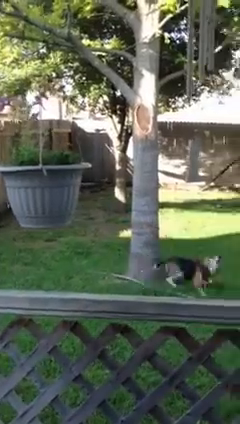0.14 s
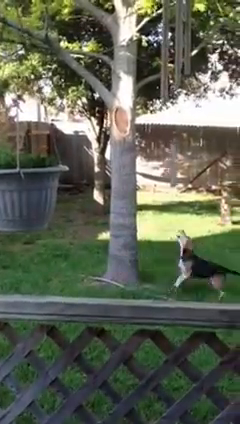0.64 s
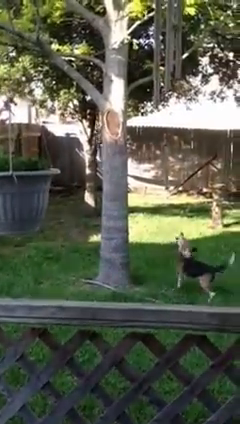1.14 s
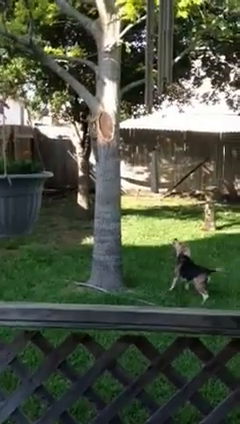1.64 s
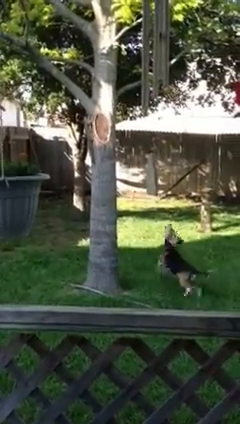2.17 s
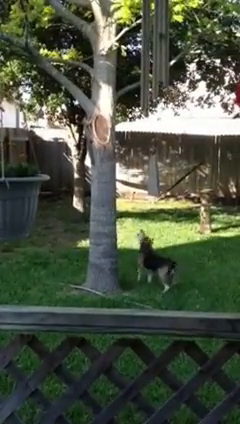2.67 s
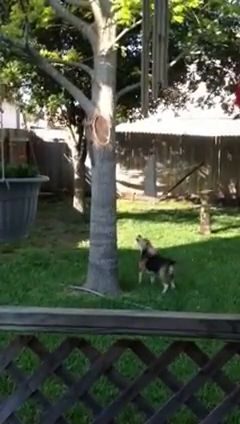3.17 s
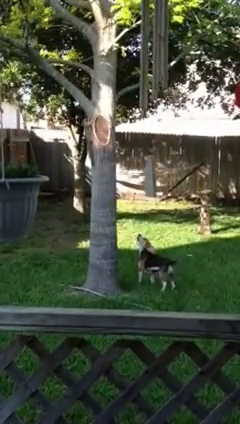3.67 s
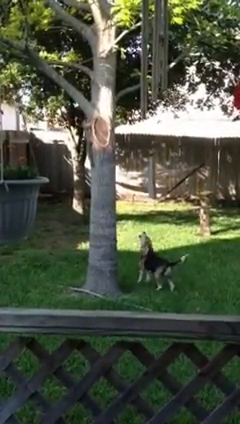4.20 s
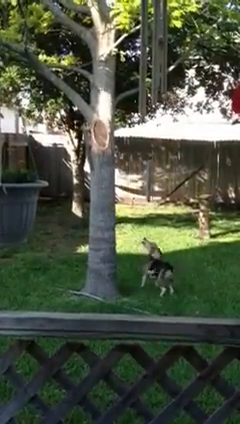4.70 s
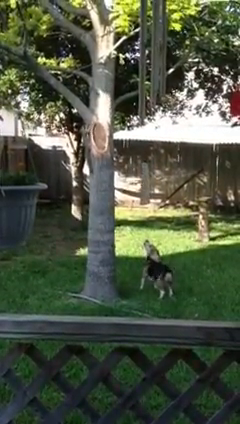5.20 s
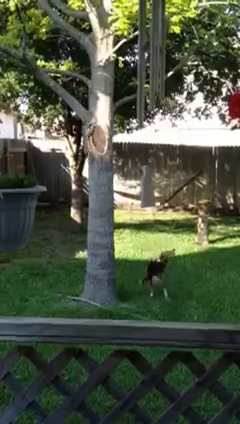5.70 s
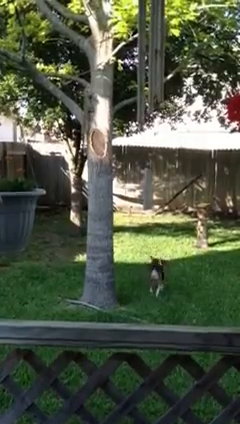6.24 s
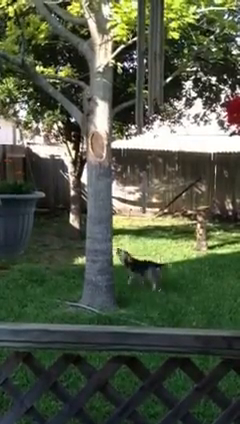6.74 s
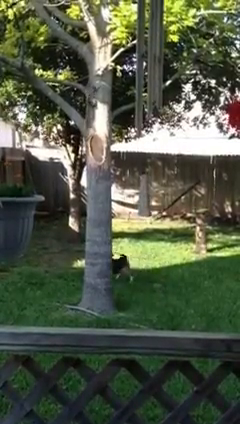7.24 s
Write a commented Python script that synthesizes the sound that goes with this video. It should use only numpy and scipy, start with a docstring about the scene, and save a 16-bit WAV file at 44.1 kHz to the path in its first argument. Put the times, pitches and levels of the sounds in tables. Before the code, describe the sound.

A hound bays in a fenced backyard, heard from several metres away, its loudest peaks slightly flattened. At 0 s a hoarse growl climbs rapidly and breaks into a clear, hollow howl around 600 Hz, wavering gently and lifting in pitch before stopping at 1.3 s. Soft paw steps brush grass near 1.8-2.1 s. A second bay runs from 2.1 to 3.2 s, rougher at the start and rising at the end; a third, from 3.8 to 4.6 s, also bends upward. Light paws patter from 4.7 to 5.3 s. A shorter bay at 5.4 s ends in a rasp near 6.1 s, followed by more steps. The last, at 6.6 s, quickly crumbles into a sagging rasp by 7 s, then a faint nasal whistle and leafy rustle. Fence echoes and a short tail follow the calls, over quiet murmur, soft bass swells and thin compressor hum.

```python
"""A hound bays five times on a fenced lawn: each call opens with a hoarse, rising growl and breaks into a
clear howl near 600 Hz. Growls are slipping pulse trains plus gated noise through a throat spectrum; howls are
harmonic lines, with half orders where cycles alternate. Two late rasps and a nasal whistle follow calls.
Fences and walls answer as echoes and a noise tail; shaped noise makes paws, stirs, bass swells and distant
murmur, steady sines a compressor next door. The loudest peaks are rounded off."""
import sys
import numpy as np
from scipy import signal
from scipy.fft import rfft, irfft, next_fast_len
from scipy.io import wavfile
from scipy.ndimage import uniform_filter1d, map_coordinates

SR = 44100
rng = np.random.default_rng(int(sys.argv[2]) if len(sys.argv) > 2 else 0)


def digitize_waveform(pressure):
    """Quantize a signal to 16-bit integers and store it at the path in sys.argv[1].

    Rows of a 2-D input are taken as channels; values are limited to [-1, 1].
    """
    field = np.atleast_2d(pressure).T
    bounded = np.clip(field, -1, 1)
    quanta = np.round(bounded * 32767).astype(np.int16)
    wavfile.write(sys.argv[1], SR, quanta)


def volts(x):
    """Linear amplitude factor 10**(x/20) for a level x in dB, scalar or array-like."""
    e = np.asarray(x, float) / 20
    return 10 ** e


N = 325017
T = np.arange(N) / SR

# open mouth and throat, relative spectrum: f/Hz, level/dB
THROAT = [(240, -68.5), (400, -20), (543, -10), (629, -4), (694, 3), (887, -8), (1080, 0), (1380, -8),
          (1590, -11), (1840, -14.5), (2070, -15), (2330, -21), (3160, -18), (3620, -40), (4200, -39.5),
          (5460, -72), (9240, -120)]
# air past the teeth, relative spectrum: f/Hz, level/dB
HISS = [(2060, -20.5), (3500, -6), (3610, 0.5), (5190, -16.5), (5760, -2.5), (6250, -4.5), (8140, -3.5),
        (10100, -18), (14300, -15.5), (15300, -20.5)]
# how far the open mouth of each call faces the listener: treble/dB
TREBLE_DB = [1.5, -1, 0, -3.5, 3.5]


def unit(x):
    """Scaled to rms 1."""
    return x / np.sqrt(np.mean(x ** 2) + 1e-20)


def along(points, hz):
    """(f/Hz, value) points interpolated on a log frequency axis."""
    f, v = np.transpose(points)
    return np.interp(np.log(hz + 1), np.log(f + 1), v)


def wobble(knots_per_s, size):
    """A smooth random curve through normally distributed knots."""
    knots = rng.standard_normal(int(size * knots_per_s / SR) + 4)
    return map_coordinates(knots, [np.arange(size) * knots_per_s / SR])


def coloured(x, spectrum):
    """x through a (f/Hz, level/dB) spectrum, at rms 1."""
    pad = 4096  # room for the zero-phase response ahead of the start
    m = next_fast_len(len(x) + 2 * pad)
    x = np.pad(x, (pad, 0))
    gain = volts(along(spectrum, np.fft.rfftfreq(m, 1 / SR)))
    return unit(irfft(rfft(x, m) * gain, m)[pad:len(x)])


def played(rows, fade_s):
    """The samples a call covers, its gate (quick start, slower end), and its columns sample by sample."""
    s, *cols = np.transpose(rows)
    span = slice(round(s[0] * SR), round(s[-1] * SR))
    t = T[span]
    gate = np.clip(np.minimum(t - s[0], (s[-1] - t) / 2.2) / fade_s, 0, 1) ** 2
    return span, gate, [np.interp(t, s, c) for c in cols]


def neighbourhood():
    """Distant murmur that drifts a little, and the slightly unsteady lines of a compressor."""
    # murmur, relative spectrum: f/Hz, level/dB
    air = [(18, -65.5), (30, -50.5), (102, -4), (201, -9), (235, -7.5), (314, -4.5), (348, -3), (440, -6),
           (704, -3), (823, -9), (1220, -8.5), (1850, -15.5), (2000, -9.5), (3110, -17), (15300, -29.5)]
    # compressor lines: f/Hz, level/dB rms before flutter
    hum_lines = [(236.9, -64.5), (355.3, -62.5), (942.1, -67), (1061, -78.5), (1179, -62), (1238, -64.5),
                 (1357, -73.5), (1766, -75.5), (1943, -76), (2003, -71), (2062, -72), (2239, -72.5),
                 (2299, -71.5)]
    murmur_db = -52 + 1.2 * wobble(2.49, size=N) + 0.6 * wobble(36, size=N)
    murmur = volts(murmur_db) * coloured(rng.standard_normal(N), air)
    drift_s = np.cumsum(1 + .0012 * wobble(8.9, size=N)) / SR  # one clock for all lines
    hum = np.zeros(N)
    for hz, db in hum_lines:
        flutter_db = 3.5 * wobble(14, size=N)
        hum += volts(db + flutter_db) * np.sqrt(2) * np.sin(2 * np.pi * (hz * drift_s + rng.random()))
    return murmur + hum


def bass_swells():
    """Soft lumps of bass noise over a low floor, with brief swells."""
    # brief swells of bass noise, some beneath the growls: t/s, peak level/dB
    swells = [(4.78, -58), (5.48, -50), (5.85, -63.5), (5.97, -57), (6.24, -55), (6.71, -54)]
    floor_db, fall_db_per_s = -64.5, 160
    band = [(25, -30.5), (70, -11.5), (150, -0.5), (230, -6.0), (500, -39.5)]  # f/Hz, level/dB
    lumps = volts(3.2 * wobble(9, size=N)) * coloured(rng.standard_normal(N), band)
    strength = volts(floor_db) + sum(volts(db - fall_db_per_s * np.abs(T - s)) for s, db in swells)
    return strength * unit(lumps)


def rustles():
    """Each paw step or thin, high stir is a burst of crackly noise around its own centre."""
    # paws in the grass: t/s, level/dB before onset and decay
    steps = [(1.84, -54), (2.07, -48), (3.408, -46.5), (4.71, -44.5), (4.951, -47.5), (5.09, -48),
             (5.209, -46), (5.337, -46.5), (6.129, -48.5), (6.27, -47.5), (6.46, -50)]
    # every paw step: decay t60/s, centre f/Hz, spread/frequency ratio
    paw = (.3, 3000, 2.2)
    # stirs, perhaps leaves: t/s, level/dB before onset and decay, t60/s, centre f/Hz, spread/frequency ratio
    stirs = [(.625, -30, 0.15, 10100, 1.3), (2.621, -51, 0.42, 11100, 2.2), (6.966, -45, 0.25, 10700, 1.8),
             (7.025, -43.5, 0.62, 6560, 1.35), (7.06, -42.5, 0.36, 4700, 1.1),
             (7.051, -49.5, 0.81, 12600, 0.7)]
    onset_s = 0.021
    out, t = np.zeros(N + SR), T[:SR // 2]
    for s, db, t60_s, hz, ratio in [(*step, *paw) for step in steps] + list(stirs):
        band = [(hz / ratio ** 2, -32), (hz / ratio, -5), (hz, 0), (hz * ratio, -6), (hz * ratio ** 2, -32)]
        grains = rng.standard_normal(len(t)) * volts(2.5 * wobble(400, size=len(t)))
        envelope = volts(db - 60 * t / t60_s) * (1 - np.exp(-t / onset_s))
        out[round(s * SR):][:len(t)] += envelope * coloured(grains, band)
    return out[:N]


def yard(x):
    """Fences and walls return smeared copies, then a short scattered tail."""
    # wall echoes: delay/s, level/dB
    walls = [(.012, -22), (.027, -12), (.058, -21.5), (.1, -21.5), (.2, -39)]
    # scattered tail: f/Hz, t60/s
    tail_t60 = [(300, 0.14), (1200, 0.84), (4000, 0.8), (12000, 0.067)]
    tail_db = -19
    echoes = np.zeros(SR // 2)
    for delay_s, db in walls:
        smear = rng.standard_normal(90) * np.hanning(90)
        echoes[round(delay_s * SR):][:len(smear)] += volts(db) * smear / np.linalg.norm(smear)
    hz, t, z = signal.stft(rng.standard_normal(SR // 2), SR, nperseg=256)
    decay = volts(-60 * t / along(tail_t60, hz)[:, None])
    tail = signal.istft(z * decay, SR, nperseg=256)[1][:SR // 2]
    return signal.fftconvolve(x, echoes + volts(tail_db) * tail / np.linalg.norm(tail))[:N]


def whistle():
    """Air drawn through the nose after the last call: a fuzzy, narrow line of noise."""
    # whistle track: t/s, f/Hz, level/dB
    track = [(7.05, 5000, -69), (7.1, 4850, -69), (7.112, 5180, -42.5), (7.162, 4900, -59),
             (7.27, 5380, -56.5), (7.348, 5070, -83), (7.36, 5170, -74)]
    out = np.zeros(N)
    span, gate, (hz, db) = played(track, fade_s=0.029)
    phase = 2 * np.pi * np.cumsum(hz) / SR
    fuzz = wobble(600, size=len(hz)) * np.cos(phase) + wobble(560, size=len(hz)) * np.sin(phase)
    out[span] = gate * volts(db) * unit(fuzz)
    return out


def openings():
    """Each opening from the shared shape: the pitch climbs quickly, then levels off."""
    # call openings: t/s, reference level/dB, final f/Hz, climb/s, attack slowness (1 = unwarped), torn share
    growls = [(0.004, -10, 611.8, 0.05, 0.85, 0.15), (2.122, -12.5, 530.3, 0.03, 0.96, .45),
              (3.779, -11.5, 535.3, 0.03, 0.92, 0.59), (5.441, -9.5, 598, .045, 0.98, 0.36),
              (6.6, -14, 610.2, .085, 2.5, 0.57)]
    # shared shape: t/s after start, level/dB re reference, upper throat/dB re level, hiss/dB re reference
    shape = [(0, -49, -8, -64), (.006, -21.5, -10, -54.5), (0.023, -8.5, -8, -44), (0.049, -3, -8, -32),
             (0.103, 0.5, -12.5, -28), (.15, -9.5, -13, -33.5), (.24, -15.5, -19.5, -33),
             (.38, -38.5, -19, -52.5)]
    from_hz, attack_s = 290, .105
    s, level_db, open_db, hiss_db = np.transpose(shape)
    age = np.linspace(0, s[-1], num=60)
    calls = []
    for (start, ref_db, top_hz, climb_s, slow, torn), treble_db in zip(growls, TREBLE_DB):
        hz = top_hz - (top_hz - from_hz) * np.exp(-(age / climb_s) ** 1.5)
        warped = np.where(age < attack_s, attack_s * (age / attack_s) ** slow, age)
        voice_db = ref_db + np.interp(warped, s, level_db)
        upper_db = treble_db + np.interp(warped, s, open_db)
        air_db = ref_db + treble_db + np.interp(warped, s, hiss_db)
        calls.append(np.transpose([start + age, hz, voice_db, upper_db, air_db, torn + 0 * age]))
    return calls


def rasps():
    """The last two calls break up in a rasp that fades and sags in pitch."""
    # rasps: t/s, length/s, starting level/dB, starting f/Hz
    breaks = [(6.031, .11, -26, 570), (6.8, .24, -27, 513.2)]
    fade_db, sag, upper_db, hiss_db, torn = 18.5, 0.043, -21, -24.5, 0.77  # growl() limits torn

    def row(s, hz, db):
        return s, hz, db, upper_db, db + hiss_db, torn

    return [[row(s, hz, db), row(s + length_s, hz * (1 - sag), db - fade_db)]
            for s, length_s, db, hz in breaks]


def growl():
    """Fold pulses slip between one, two and three cycles a pattern; noise gated once a cycle, hiss above."""
    out = np.zeros(N)
    knot_hz = np.transpose(THROAT)[0]
    low = THROAT + np.column_stack([0 * knot_hz, -60 * (knot_hz > 2000)])
    high = THROAT + np.column_stack([0 * knot_hz, -60 * (knot_hz < 1700)])
    for rows in openings() + rasps():
        span, gate, (hz, db, open_db, hiss_db, torn) = played(rows, fade_s=0.011)
        n = len(hz)
        phase = 2 * np.pi * np.cumsum(hz * (1 + 0.011 * wobble(120, size=n))) / SR
        # cycle jitter smears the upper partials
        blur = 2 * np.pi * np.cumsum(hz * .045 * wobble(200, size=n)) / SR
        puffs = (1 + 1.1 * np.cos(phase)) * volts(0.89 * wobble(88, size=n))

        def line(k, flicker_db, smear):
            flicker = volts(flicker_db * wobble(45.06, size=n))
            return flicker * np.cos(k * phase + smear + rng.uniform(0, 2 * np.pi))

        def noise():
            return unit(puffs * volts(0.92 * wobble(26, size=n)) * rng.standard_normal(n))

        # the mouth opens as the pitch climbs: at first a soft, clean second partial
        closed = np.clip((500 - hz) / 150, 0, 1)
        torn = np.clip(torn, .05, .65) * (1 - .9 * closed)
        pulses = unit(sum(volts(-17 * closed * abs(k - 2)) * line(k, 3.5, blur * max(k - 2.7, 0))
                          for k in range(1, 9)))
        slips = unit(sum(line(k + part, 7.5, blur * (k - 1))
                         for k in range(1, 9) for part in (1 / 3, 1 / 2, 2 / 3)))
        source = np.sqrt(1 - torn) * pulses + np.sqrt(torn) * (slips + volts(-3) * noise())
        voiced = coloured(source, low) + volts(open_db) * coloured(source, high)
        hiss = volts(hiss_db + 2.1 * wobble(22, size=n)) * coloured(noise(), HISS)
        out[span] += gate * (volts(db) * voiced + hiss)
    return out


def alternation_db(t):
    """Alternating cycles: half orders jump up for a spell, drop, then trail away slowly."""
    # spells: t/s, length/s, half-order level/dB
    spells = [(0.206, 0.18, -22.5), (2.237, 0.18, -30), (2.58, 0.092, -31), (3.837, 0.044, -31),
              (3.962, 0.11, -27), (5.604, 0.18, -30), (5.925, 0.053, -30.5), (6.694, 0.041, -24),
              (6.82, 0.037, -25), (6.903, .04, -34)]
    rise_db_per_s, fall_db_per_s, trail_db, trail_db_per_s = 896, 502, 23.5, 55
    start, length, db = np.transpose(spells)[..., None]
    before = np.clip(start - t, 0, None)
    after = np.clip(t - start - length, 0, None)
    fall_db = np.minimum(fall_db_per_s * after, trail_db + trail_db_per_s * after)
    return np.max(db - rise_db_per_s * before - fall_db, axis=0)


def howl():
    """Steady folds: a near-sine and its next two partials, half orders, torn overtones and breath."""
    # one track per call: t/s, f/Hz, fundamental/dB, octave/dB
    howls = [
        [(0.09, 576.6, -17.5, -12), (0.136, 622.4, -12, -23), (0.202, 637.7, -16, -25.5),
         (0.214, 634.7, -30, -18), (0.28, 642.7, -12, -26.5), (0.33, 627.5, -7, -16.5),
         (0.388, 617.7, -8, -29.5), (0.45, 607.8, -14, -20), (0.484, 604, -18.5, -31), (0.574, 597, -9, -20.5),
         (0.596, 602.3, -12, -30), (0.66, 601, -11, -18.5), (0.782, 592, -12, -44.5), (0.806, 591, -9.5, -28),
         (0.88, 593.3, -16, -21), (1.004, 597.8, -14, -31.5), (1.126, 589.3, -15.5, -23.5),
         (1.228, 643, -10.5, -31.5), (1.252, 644, -27, -38), (1.276, 632, -23.5, -43), (1.31, 633, -36, -36)],
        [(2.22, 565.4, -12, -17), (2.246, 610.7, -9.5, -24.5), (2.332, 598, -8, -16), (2.362, 618, -5, -37),
         (2.388, 621.6, -7.5, -17), (2.454, 610, -7, -16.5), (2.484, 603.2, -8.5, -45),
         (2.502, 606.2, -12.5, -27), (2.788, 592.4, -16.5, -18.5), (2.824, 594.5, -17, -28.5),
         (2.914, 597.6, -16.5, -17), (2.978, 613, -11, -34), (3.008, 621.4, -11.5, -24.5),
         (3.08, 637, -11, -31), (3.158, 641.6, -50, -35), (3.17, 637, -42, -43)],
        [(3.84, 744, -14.5, -42), (3.864, 726, -12, -36), (3.878, 659.6, -9.5, -35.5),
         (3.906, 661.7, -11.5, -46), (3.922, 634, -8, -31), (3.956, 605.4, -11, -23.5),
         (4.042, 607.8, -11, -29.5), (4.062, 609, -11.5, -19), (4.122, 626, -18, -22),
         (4.216, 607, -12.5, -18.5), (4.288, 609, -10.5, -38), (4.312, 605.3, -13.5, -24),
         (4.342, 605, -12.5, -38), (4.386, 617.6, -9, -21), (4.472, 640.4, -7.5, -22), (4.566, 659.4, -14, -37),
         (4.63, 677, -27, -25)],
        [(5.56, 600, -15, -14), (5.586, 639.3, -7, -32), (5.652, 612, -15, -27.5), (5.658, 617.6, -14, -36),
         (5.684, 615.3, -11.5, -21.5), (5.752, 617.2, -11, -31.5), (5.976, 604.5, -21, -20.5),
         (5.998, 602, -22, -44), (6.028, 606.5, -20, -22), (6.05, 623, -33, -32)],
        [(6.7, 696, -20.5, -39), (6.718, 658, -15, -29), (6.78, 647.5, -9, -19.5), (6.808, 616.3, -12, -28),
         (6.822, 611.2, -14.5, -16), (6.838, 597, -24, -34), (6.844, 594.4, -19.5, -21),
         (6.89, 627.5, -27.5, -32), (6.94, 593, -42, -31)],
    ]
    # half orders: multiple of the pitch, level/dB re alternation level
    half_orders = [(.5, -35), (1.5, -6), (2.5, -3.5), (3.5, -33), (4.5, -21), (5.5, -58)]
    # mouth, relative spectrum for the overtones: f/Hz, level/dB
    mouth_db = [(1290, -49), (2200, -10.5), (2360, -2.5), (2440, 3), (2960, -12), (3650, 0), (3950, -16),
                (4870, -16.5), (7220, -9), (8620, -18), (12300, -21), (13200, -24.5), (15000, -27)]
    # mouth resonance that the fifth partial crosses as the pitch lifts: f/Hz, half-width/Hz, gain/dB
    mouth_ring = (3350, 110, 4.3)
    # the third partial flares as the voice breaks clear: t/s, peak level/dB
    flares = [(.128, -11), (2.232, -26), (5.565, -31)]
    flare_fall_db_per_s = 600.5
    follows, usual_db = 0.18, -7  # overtones follow this share of the fundamental's dB change
    rest_hz, lift_db_per_hz = 609.6, 0.37  # pitch above rest late in a call brightens partials 4 and 5
    jitter, jitter_per_hz = .003, .00016  # share of the pitch; tiring folds waver more above rest
    out = np.zeros(N)
    centre_hz, width_hz, ring_db = mouth_ring

    def mouth(hz):
        return along(mouth_db, hz) + ring_db / (1 + ((hz - centre_hz) / width_hz) ** 2)

    for rows, treble_db in zip(howls, TREBLE_DB):
        span, gate, (hz, first_db, octave_db) = played(rows, fade_s=0.011)
        n = len(hz)
        age = T[:n]

        # overtone levels start offset and settle as the mouth narrows
        def settle(db, extra_db, settle_s, swell_db):
            settling_db = db + extra_db * np.exp(-age / settle_s)
            return settling_db + swell_db * wobble(12.14, size=n) + follows * (first_db - usual_db)

        third_db = settle(-47, extra_db=31, settle_s=0.0267, swell_db=7)
        middle_db = settle(-49.5, extra_db=26, settle_s=0.11, swell_db=4)
        sixth_db = settle(-49.5, extra_db=-7.5, settle_s=0.6, swell_db=6)
        top_db = settle(-56, extra_db=17, settle_s=0.5, swell_db=1.5) + treble_db
        flare = sum(volts(db - flare_fall_db_per_s * np.abs(T[span] - s)) for s, db in flares)
        lift_hz = np.clip(hz - rest_hz, 0, 50) * np.arange(n) / n
        middle_db = middle_db + lift_db_per_hz * lift_hz
        hz = uniform_filter1d(hz, size=SR // 25, mode="nearest")  # the folds follow the muscles sluggishly
        waver = (jitter + jitter_per_hz * lift_hz) * wobble(59.82, size=n)
        phase = 2 * np.pi * np.cumsum(hz * (1 + waver)) / SR

        def line(k, flicker_db):
            flicker = volts(flicker_db * wobble(29.89, size=n))
            return np.sqrt(2) * flicker * np.cos(k * phase + rng.uniform(0, 2 * np.pi))

        # each overtone also swells and fades slowly at random, independently of the others
        def stack(orders):
            return unit(sum(volts(mouth(k * hz) + 2.2 * wobble(5, size=n)) * line(k, 4.2) for k in orders))

        core = volts(first_db) * line(1, 0.14) + volts(octave_db) * line(2, 2.53)
        core += (volts(third_db) + flare) * line(3, 1.6)
        halves = volts(alternation_db(T[span])) * sum(volts(db) * line(k, 6.14) for k, db in half_orders)
        settled = np.clip(age / .24, 0, 1) ** 2  # overtones clear up once the folds have locked
        breath = volts(-5.5) * coloured((1 + .8 * np.cos(phase)) * rng.standard_normal(n), HISS)
        throat_noise = volts(-10) * coloured(rng.standard_normal(n), THROAT)
        upper = volts(middle_db) * (settled * stack(range(4, 6)) + throat_noise)
        upper += volts(sixth_db) * settled * line(6, 2.8)
        upper += volts(top_db) * (settled * stack(range(7, 24)) + breath)
        out[span] += gate * (core + halves + upper)
    return out


def scene():
    """The dog, its echoes and the garden around it."""
    dog = growl() + howl() + whistle()
    return (neighbourhood() + bass_swells() + rustles() + yard(dog) + dog)[None]


def top_cut(x):
    """Nothing passes above the cut-off."""
    return signal.sosfilt(signal.butter(12, 15410, fs=SR, output="sos"), x)


def record(dry):
    """The input stage rounds off the highest peaks and passes little deep bass."""
    top, hard = .97, 10.5  # ceiling re full scale, knee exponent
    clipped = dry / (1 + np.abs(dry / top) ** hard) ** (1 / hard)
    mix = signal.lfilter(*signal.butter(1, 80, "high", fs=SR), clipped)
    return top_cut(mix)


dry = scene()
out = record(dry)
digitize_waveform(out)
```